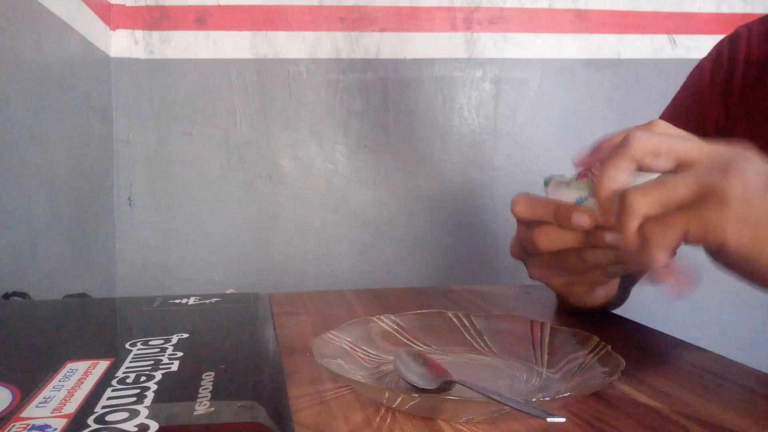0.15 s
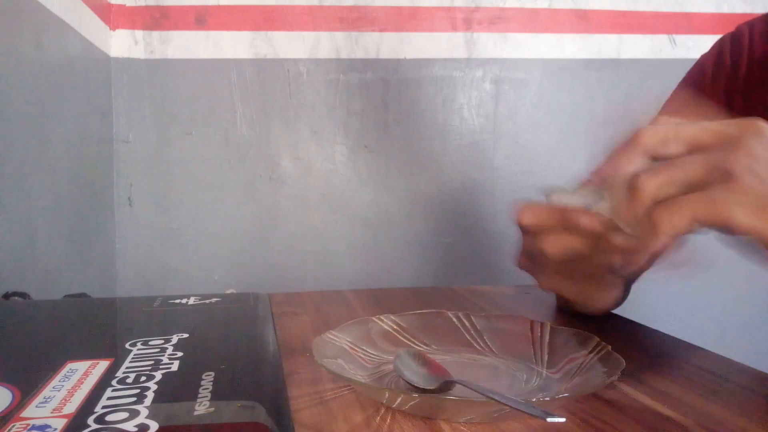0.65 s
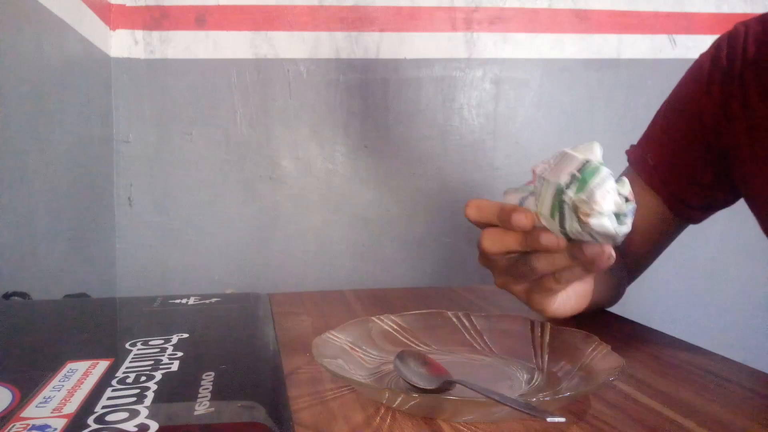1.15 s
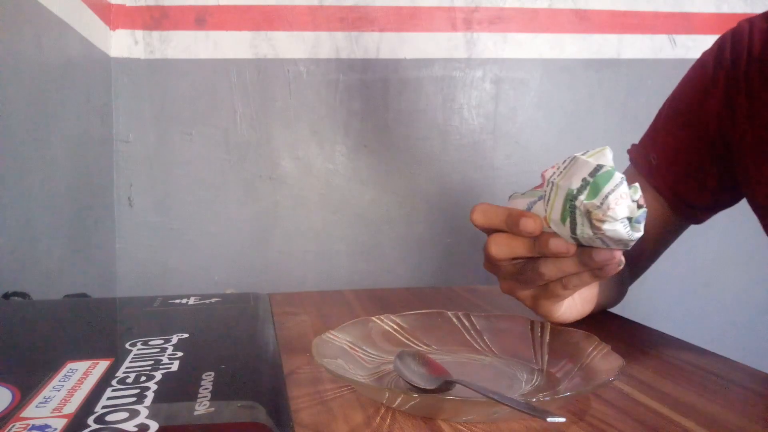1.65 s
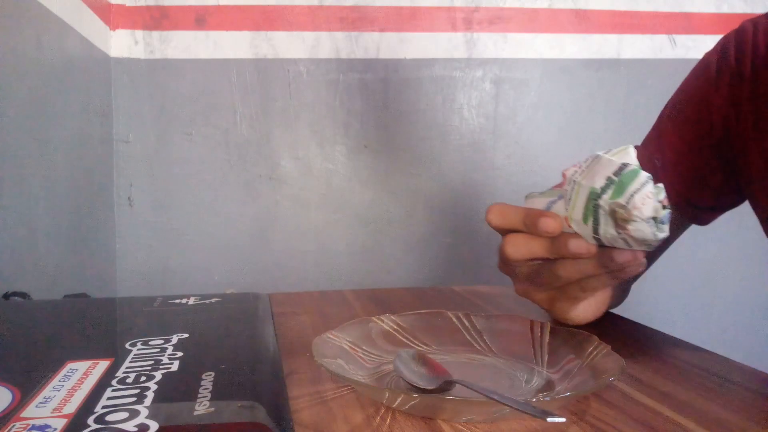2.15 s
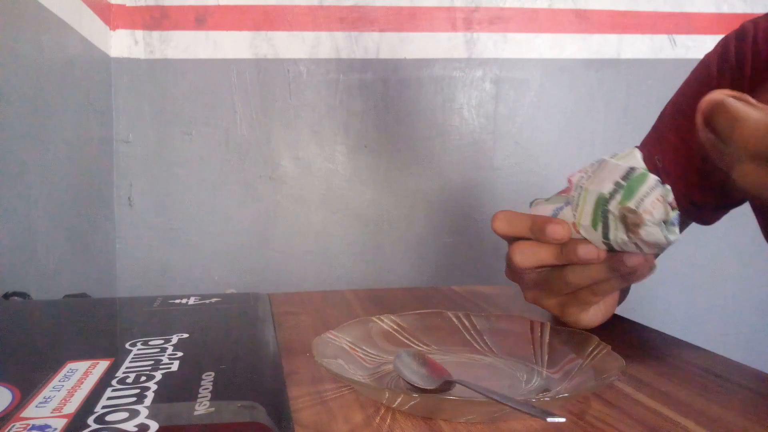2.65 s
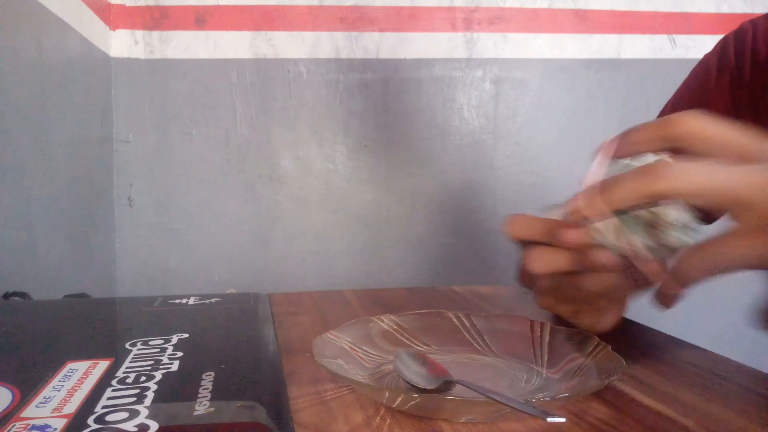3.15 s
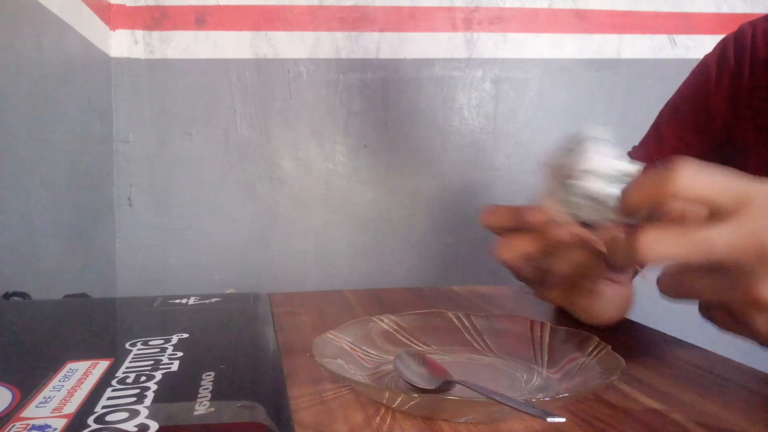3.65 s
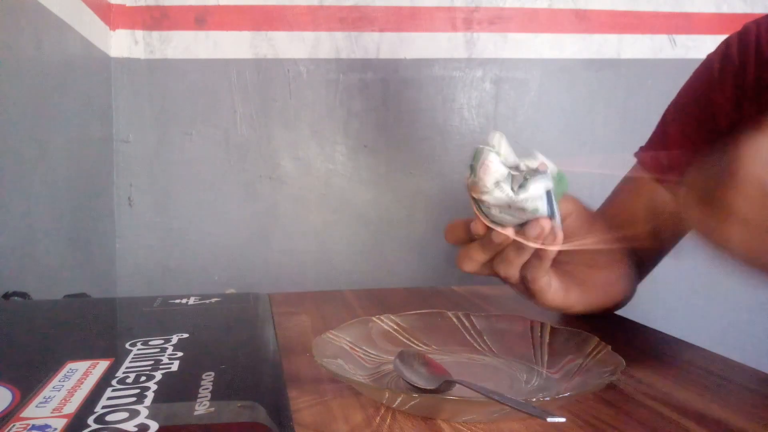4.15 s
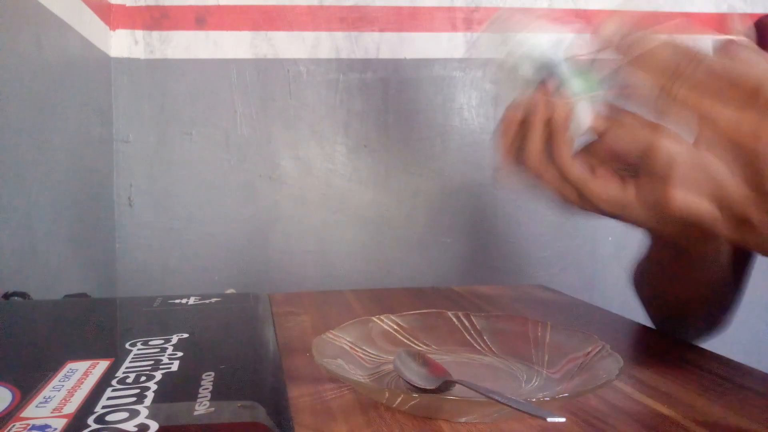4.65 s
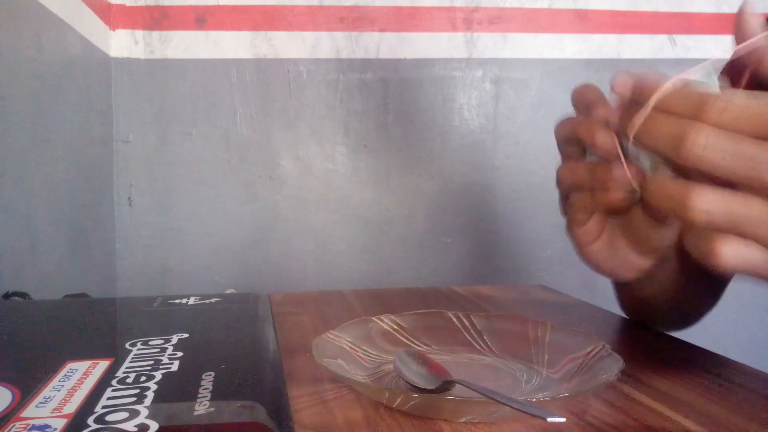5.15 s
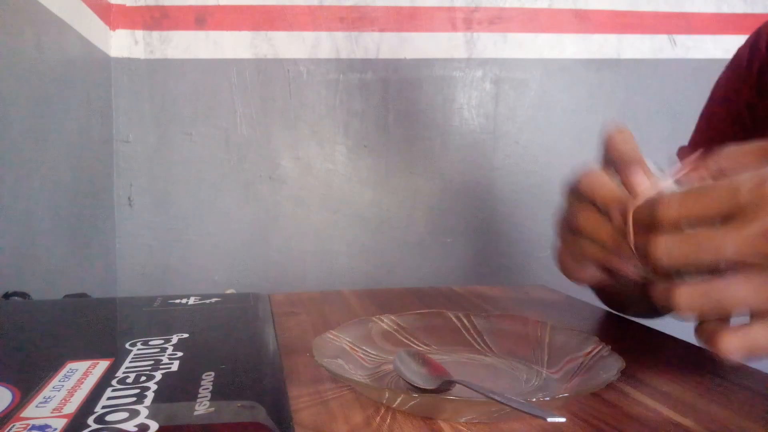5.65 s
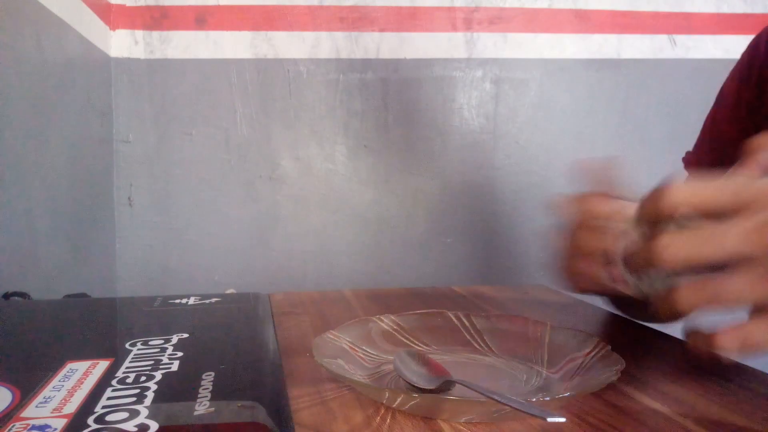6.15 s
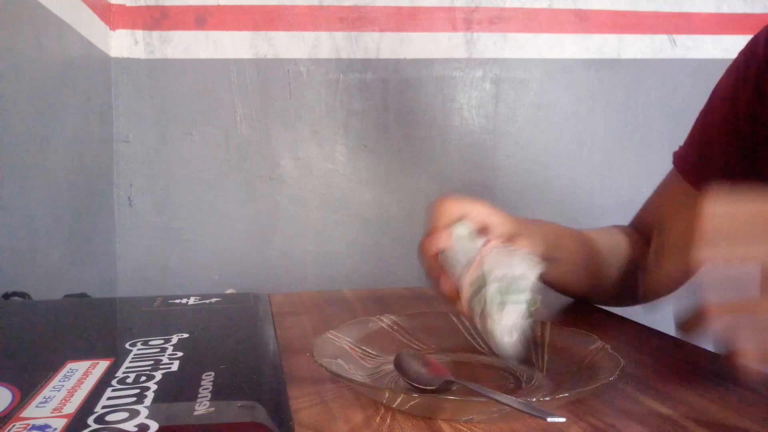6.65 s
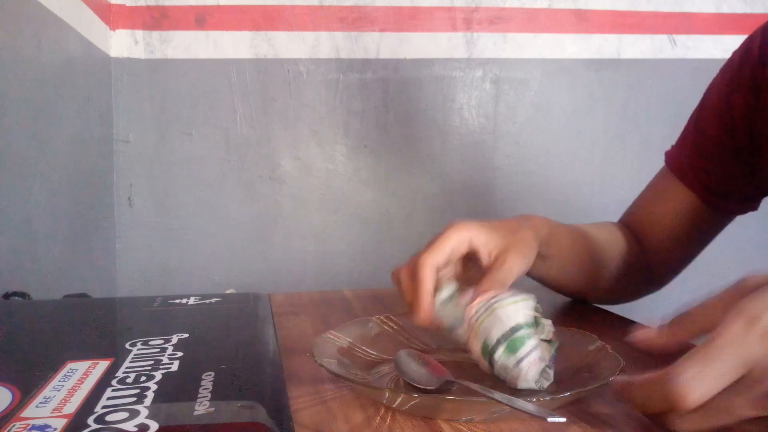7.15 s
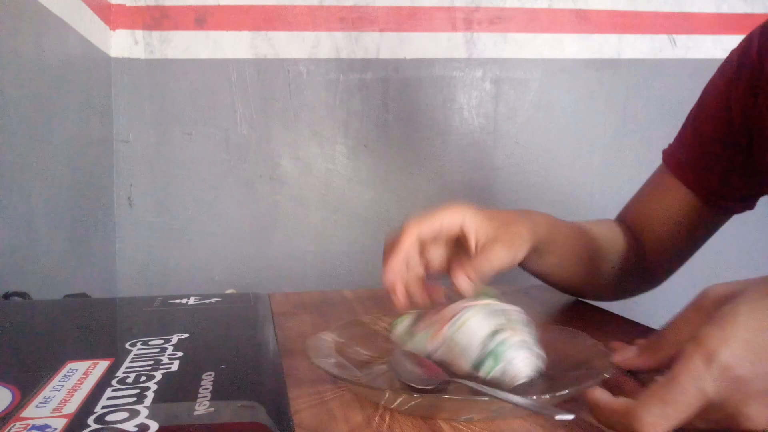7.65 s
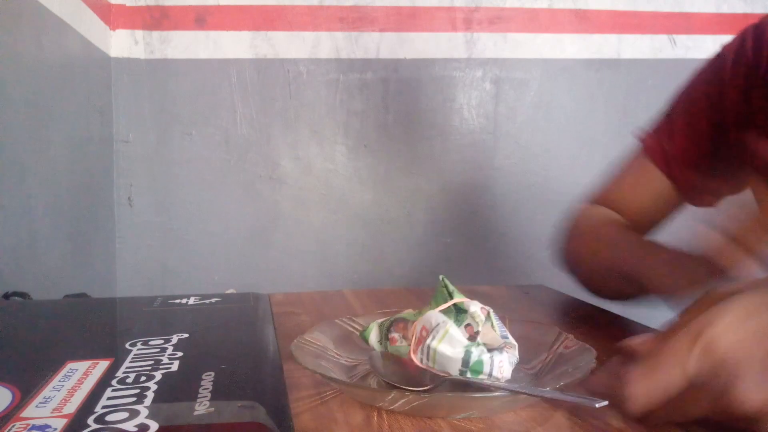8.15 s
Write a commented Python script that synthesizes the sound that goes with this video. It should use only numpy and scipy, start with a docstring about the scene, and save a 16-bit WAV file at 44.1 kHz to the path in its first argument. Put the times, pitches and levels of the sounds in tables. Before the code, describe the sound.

Paper wrapper crackles and creases in close hands, then is set down softly before a glass plate slides on wood and a spoon clinks.

```python
"""Paper parcel on a plate

A paper food wrapper is folded and touches a glass plate; the plate slides on a wooden table, a spoon clinks.
Creases are noise bursts into resonances, rustle is clumped crackle, wood and glass are ringing modes.
Snaps, table and plate excite a small bare room. Behind lie a low rumble that swells at times with the
handling, faint resonances, hiss, a brief far drone of harmonics and a far chirp of gliding partials."""
import sys
import numpy as np
from scipy import signal
from scipy.fft import rfft, irfft
from scipy.io import wavfile

SR = 44100
rng = np.random.default_rng(int(sys.argv[2]) if len(sys.argv) > 2 else 0)


def volts(x):
    """Linear amplitude factor 10**(x/20) for a level x in dB, scalar or array-like."""
    e = np.asarray(x, float) / 20
    return 10 ** e


def master(y):
    """Save y as 16-bit WAV."""
    cut = np.clip(np.atleast_2d(y).T, -1, 1)
    pcm = np.round(cut * 32767)  # scale
    wavfile.write(sys.argv[1], SR, pcm.astype(np.int16))


N = 364707


def rms_one(x):
    """Scale to rms 1."""
    return x / np.sqrt(np.mean(x ** 2) + 1e-20)


def in_time(rows):
    """Table columns as curves, sample by sample."""
    s, *columns = np.transpose(rows)
    return [np.interp(np.arange(N) / SR, s, c) for c in columns]


def during(rows, fade_s):
    """1 while a table lasts, fading to 0 outside."""
    start, end = rows[0][0], rows[-1][0]
    return np.interp(np.arange(N) / SR, [start - fade_s, start, end, end + fade_s], [0, 1, 1, 0])


def band(x, low_hz, high_hz):
    """Band-pass."""
    return signal.sosfilt(signal.butter(2, [low_hz, high_hz], "band", fs=SR, output="sos"), x + 1e-18)


def hump(x, hz, width_hz):
    """Resonance with peak gain 1."""
    r = np.exp(-np.pi * width_hz / SR)
    feedback = [1, -2 * r * np.cos(2 * np.pi * hz / SR), r * r]
    return signal.lfilter([(1 - r * r) / 2, 0, (r * r - 1) / 2], feedback, x)


def ring(clicks, hz, t60_s):
    """Decaying mode: a unit click starts a sine of height 1."""
    r, w = volts(-60 / (t60_s * SR)), 2 * np.pi * hz / SR
    return signal.lfilter([0, np.sin(w)], [1, -2 * r * np.cos(w), r * r], clicks + 1e-18)


def drift(rate_hz):
    """Slow random curve of rms 1: noise through two equal low-pass poles."""
    step = 40   # computed every 40th sample
    r = np.exp(-2 * np.pi * step * rate_hz / SR)
    noise = rng.standard_normal(N // step + 2002)
    slow = signal.lfilter([1], [1, -2 * r, r * r], noise)[2000:]
    return np.interp(np.arange(N) / step, np.arange(len(slow)), rms_one(slow))


def grains(per_s, spread_db):
    """Random clicks of uneven size and sign, rms 1."""
    sizes = volts(spread_db * np.minimum(rng.exponential(1, N), 5)) * rng.choice([-1, 1], N)
    return rms_one(sizes * (rng.random(N) < per_s / SR))


def folds_db(middle_db, edge_db, bright_db):
    """Levels of broad, middle and fine folds: brightness tilts fine against broad."""
    return [edge_db - bright_db / 2, middle_db, edge_db + bright_db / 2]


# room tone spectrum: f/Hz, relative density/dB per Hz
HISS_SPECTRUM = [(18, -42), (30, -4), (64, 0), (161, 4.5), (264, -12.5), (372, -22.5), (581, -8),
                 (1030, -17), (1610, -10), (2870, -19.5), (5990, -12.5), (8200, -36), (10400, -21),
                 (13200, -28.5), (15800, -20.5)]


def hiss():
    """Steady room tone: white noise shaped in the spectrum."""
    level_db = -74.5   # rms within 500-21000 Hz
    hz = np.maximum(np.fft.rfftfreq(N, 1 / SR), 20)
    shape_hz, shape_db = np.transpose(HISS_SPECTRUM)
    shape = volts(np.interp(np.log(hz), np.log(shape_hz), shape_db))
    noise = irfft(rfft(rng.standard_normal(N)) * shape, N)
    return volts(level_db) * noise / np.std(band(noise, 500, 21000))


# low rumble, swelling at times with the handling: t/s, lower pair level/dB, upper pair level/dB
RUMBLE_LEVELS = [(0.0, -66.5, -65.5), (2.14, -73.5, -73), (2.39, -67.5, -74), (2.62, -73, -72),
                 (3.18, -77.5, -72), (3.5, -66.5, -69.5), (3.75, -71, -75), (4.79, -66, -81),
                 (5.37, -67.5, -78.5), (6.13, -76, -69.5), (6.47, -73.5, -79.5), (7.09, -70.5, -77),
                 (7.6, -74.5, -71.5), (7.92, -63, -58), (8.15, -74, -69), (8.27, -77, -75)]
# its resonances: f/Hz, width of first pass/Hz, relative level/dB
RUMBLE_RESONANCES = [(146.5, 27, 0), (201, 49, -3), (295.5, 78, -2), (383, 49, -6.5)]


def rumble():
    """Low noise in two pairs of resonances, each wavering in level."""
    out = 0
    pair_levels = np.repeat(in_time(RUMBLE_LEVELS), 2, axis=0)
    for (hz, width_hz, db), pair_db in zip(RUMBLE_RESONANCES, pair_levels):
        tone = hump(hump(rng.standard_normal(N), hz, width_hz), hz, 2 * width_hz)
        out = out + volts(pair_db + db + 4.04 * drift(3.25)) * rms_one(tone)
    return out


# faint resonances in the room tone: f/Hz, width of each pass/Hz, mean level/dB
MURMUR_RESONANCES = [(554, 170, -91), (797, 80, -89), (1700, 73, -91.5), (4340, 150, -98), (5890, 270, -90)]


def murmur():
    """One noise through narrow resonances, each wandering in level."""
    noise, out = rng.standard_normal(N), 0
    for hz, width_hz, db in MURMUR_RESONANCES:
        tone = hump(hump(noise, hz, width_hz), hz, width_hz)
        out = out + volts(db + 4.3 * drift(1.9)) * rms_one(tone)
    return out


# fingers brushing paper: t of top/s, rise sigma/s, fall sigma/s, middle fold level/dB, brightness/dB
PAPER_RUBS = [(.11, 0.012, 0.07, -67.5, 20), (.763, 0.017, 0.033, -53.5, 5),
              (1.125, 0.043, .032, -73.5, 12), (1.515, 0.013, .027, -67.5, -46),
              (1.61, 0.0028, 0.018, -67.5, 12), (1.70, 0.024, 0.024, -71, 26),
              (3.462, 0.011, 0.085, -59, 8), (3.695, 0.015, .03, -55.5, 15),
              (4.38, 0.016, 0.051, -67.5, 3.5), (4.80, 0.048, 0.049, -69.5, -3),
              (5.05, 0.0037, 0.073, -65.5, 7), (5.32, 0.0076, 0.015, -71, 28),
              (5.375, .0044, 0.084, -61, 3), (5.519, 0.021, 0.036, -59, 5.5), (6.351, 0.1, 0.033, -62, 17),
              (6.615, 0.014, 0.031, -66.5, 7), (6.83, .033, 0.042, -69.5, 12),
              (7.09, 0.032, 0.054, -74.5, 22), (7.55, 0.036, 0.026, -78, 8)]


def rubs():
    """Brush gains of the three fold sizes: each swells and dies as a lopsided bell."""
    edge_db = -1.5   # broad and fine folds against middle
    t, swell = np.arange(0, N / SR, .001), 0
    for s, rise_s, fall_s, db, bright_db in PAPER_RUBS:
        shape = np.exp(-.5 * ((t - s) / np.where(t < s, rise_s, fall_s)) ** 2)
        gains = volts(np.array(folds_db(db, db + edge_db, bright_db)))
        swell = swell + gains[:, None] * shape
    return [np.interp(np.arange(N) / SR, t, row) for row in swell]


# broad, middle, fine folds: low f/Hz, high f/Hz
FOLD_BANDS = [(450, 1600), (1600, 6500), (6500, 15800)]
# paper rustle; from 7.88 s the scrape of the sliding plate:
# t/s, middle fold level/dB, brightness (fine over broad)/dB
RUSTLE_LEVELS = [(0, -73.5, -13), (.378, -56.5, 18), (.558, -63, -9), (.9, -74, 6), (1.3, -82, 3),
                 (1.7, -70, 8), (1.95, -79.5, -2.5), (3.12, -84, -4), (3.4, -68.5, 8), (3.58, -60.5, -9),
                 (3.97, -70.5, 4), (4.65, -73.5, -1), (4.72, -80, -11), (5.32, -66.5, 16), (5.7, -70.5, 8),
                 (5.97, -56.5, -3), (6.15, -65, -5), (6.34, -64, -13), (6.45, -79, 10), (6.88, -83, -11),
                 (7.02, -76, 13), (7.5, -93, 1), (7.88, -71.5, -17), (7.94, -54, -9), (8.11, -66, -19),
                 (8.27, -80, 2)]


def rustle():
    """Dense crackle in clumps through fold resonances whose levels wander, so the colour does too."""
    even_db, edge_follow = -81, 0.56   # folds level here; broad and fine follow this share of the rise
    out, clumps = 0, drift(42)
    level_db, bright_db = in_time(RUSTLE_LEVELS)
    edge_db = even_db + edge_follow * (level_db - even_db)
    sliding_db = folds_db(level_db, edge_db, bright_db)
    for (low, high), db, swell in zip(FOLD_BANDS, sliding_db, rubs()):
        crackle = grains(3100, spread_db=2.5) + 1.7 * rng.standard_normal(N)
        folds = 0
        for hz in np.geomspace(1.124 * low, high / 1.134, 6):
            folds = folds + volts(3.5 * drift(4)) * hump(crackle, hz, .16 * hz) / np.sqrt(hz)
        out = out + rms_one(band(folds, low, high)) * (volts(db) + swell) * volts(1.38 * clumps)
    return out


def random_snaps():
    """Small creases at random, denser and louder with the rustle; rows as SET_SNAPS."""
    count, put_down_s = 60, 7.3   # none once the parcel lies still
    density = 1.1   # exponent on rustle amplitude
    level_db = in_time(RUSTLE_LEVELS)[0]
    share = np.cumsum(volts(density * level_db[:round(put_down_s * SR)]))
    when, loudness, pitch, brightness = rng.random((count, 4)).T
    at = np.searchsorted(share, when * share[-1]).clip(0, N - 1)
    flap_db = level_db[at] + 11.5 + 12.8 * loudness
    flap_hz = 650 * 6.4 ** pitch
    return np.column_stack([at / SR, flap_db, flap_hz, flap_db - 17, 30 * (brightness - .4)])


# creases at set times, loud and faint:
# t/s, flap peak/dB, flap f/Hz, sheet shake level/dB, brightness (fine over broad)/dB
SET_SNAPS = [(.024, -42, 790, -58.5, -17), (.064, -42.5, 760, -66, 2), (.141, -51, 760, -48, 20),
             (.169, -30.5, 7000, -38, 25), (.254, -34, 1800, -49, -6), (.261, -30, 4260, -54.5, -17),
             (.266, -32, 810, -54, -2), (.299, -38, 2040, -55, 13), (.328, -48, 1720, -55, 21),
             (.367, -26, 5670, -49.5, 14), (.383, -18.5, 7150, -41.5, 13.5), (.442, -37, 2260, -67, -10),
             (.462, -45, 790, -47, -6), (.478, -37, 3670, -42, -3.5), (.507, -41, 800, -46.5, 1),
             (.602, -30.5, 3930, -52.5, 32), (.632, -29, 4960, -49, 29.5), (.67, -34, 6500, -50, 22),
             (.674, -34.5, 6330, -49, 2), (.688, -49, 2350, -48, 10), (.728, -37.5, 4900, -57, -6),
             (.968, -36.5, 4000, -50, 3.5), (1.02, -40, 2240, -64, -16), (1.131, -53.5, 5600, -54, 13),
             (1.491, -36, 840, -43.5, 8), (1.53, -38, 804, -53, 20), (1.653, -39, 2200, -54, 21),
             (3.197, -57, 6050, -72, 26), (3.271, -57, 1540, -66, 20), (3.325, -49, 5530, -72, 33),
             (3.508, -32, 6500, -61, 30), (3.516, -37, 426, -31.5, -2), (3.566, -29.5, 1280, -41, 3),
             (3.607, -27, 1820, -41, -4), (3.661, -42, 1740, -50.5, -8), (3.709, -43, 6320, -52, 20),
             (3.801, -61, 681, -76, -7), (3.852, -57, 2400, -69, -24), (4.051, -42.5, 800, -64, 4),
             (4.096, -39.5, 641, -42, 0), (4.119, -41, 1650, -50.5, 6), (4.315, -47, 708, -65, 7),
             (4.731, -38.5, 3670, -47, 7.5), (4.774, -32.5, 4240, -52.5, 8), (4.85, -52, 540, -46, -14),
             (5.002, -54.5, 2150, -68, 3), (5.072, -51, 643, -59, 2), (5.162, -22, 2330, -31.5, 17.5),
             (5.233, -35.5, 2030, -47.5, -9), (5.245, -43, 7000, -56, 27), (5.289, -39, 810, -46, -9),
             (5.359, -15.5, 2700, -38.5, 12), (5.397, -24, 1506, -34.5, 8), (5.611, -37, 2050, -53.5, -6),
             (5.658, -49, 2250, -58, 32), (5.751, -26.5, 1303, -33.5, -4), (5.813, -33, 1860, -49, -4),
             (5.853, -23.5, 1820, -41, -4.5), (5.917, -36, 810, -55, 0), (5.931, -53, 830, -47, 15),
             (5.95, -26, 3490, -30.5, 8.5), (5.972, -43, 896, -52, 0), (5.997, -46, 3000, -53, 9),
             (6.018, -31, 1180, -41.5, 13), (6.036, -32, 1390, -41, -11), (6.117, -46, 2610, -54.5, 4),
             (6.142, -38, 1150, -56, -9), (6.155, -43, 800, -51, 12.5), (6.167, -19, 4520, -33.5, 1),
             (6.17, -15, 1740, -24, 8), (6.243, -39.5, 870, -64, 15), (6.274, -38.5, 1150, -55, 27),
             (6.603, -34.5, 7000, -58.5, 33), (6.617, -41, 5000, -62, 33), (6.852, -53.5, 3720, -51.5, -2),
             (7.276, -51, 650, -65, 7), (7.592, -51.5, 2300, -65, -9)]


def snaps():
    """A crease buckles in a burst of a few ms; the whole sheet shakes and one flap rings out."""
    buckle_s_at_1k, buckle_slope, buckle_spread = 3.1e-3, .22, .15   # smaller flaps buckle faster
    crack, fold_ring, jolt_share = .32, 1.8, .15
    edge_db, shake_s = -3, .0023   # broad and fine against middle; span that the shake level refers to
    out, t = np.zeros((4, N + 2600)), np.arange(2600) / SR
    rows = np.vstack([SET_SNAPS, random_snaps()])
    shaking, chance = rng.standard_normal((len(rows), 4, len(t))), rng.standard_normal(len(rows))
    jolts = rng.random((len(rows), 1, len(t) // 20)) < jolt_share
    shaking *= 0.65 + 1.4 * np.repeat(jolts, 20, axis=2)
    pitches = rng.random((len(rows), 3))
    for row, noise, luck, pitch in zip(rows, shaking, chance, pitches):
        s, flap_db, flap_hz, sheet_db, bright_db = row
        tau_s = buckle_s_at_1k * (1000 / flap_hz) ** buckle_slope * np.exp(buckle_spread * luck)
        attack = np.minimum(t / (0.6 * tau_s), 1)
        burst = noise * (np.exp(-t / tau_s) + 0.049 * np.exp(-t / 0.01)) * attack
        burst[:, round(.4 * tau_s * SR)] += crack * np.sqrt(tau_s * SR)   # the crease flips
        now = slice(round(s * SR), round(s * SR) + len(t))
        flap = hump(burst[3], flap_hz, .34 * flap_hz)
        out[3, now] += volts(flap_db) * flap / np.abs(flap).max()
        for k, db in enumerate(folds_db(sheet_db, sheet_db + edge_db, bright_db)):
            low, high = FOLD_BANDS[k]
            sheet = band(burst[k], low, high)
            hz = low * (high / low) ** pitch[k]   # each fold size rings at a pitch of its own
            sheet = sheet + fold_ring * hump(sheet, hz, 0.14 * hz)
            out[k, now] += volts(db) * sheet * np.sqrt(shake_s * SR) / np.linalg.norm(sheet)
    sheets = sum(band(out[k, :N], .75 * low, 1.1 * high) for k, (low, high) in enumerate(FOLD_BANDS))
    return out[3, :N] + sheets


# table knocks: t/s, drive level/dB, contact time scale/ms
TABLE_KNOCKS = [(.549, -61, 1.3), (.768, -49, 0.25), (1.489, -42.5, 0.57), (1.514, -32.5, 0.13),
                (1.527, -60, 0.19), (3.513, -53, 0.24), (3.562, -36, 0.16), (4.433, -46, 0.5),
                (6.392, -52, 0.32), (6.854, -33.5, 2.95), (7.015, -48, 0.97), (7.061, -61, .65),
                (7.274, -46.5, 1.2), (7.298, -51.5, 0.78), (7.594, -50, 1), (7.908, -36.5, 0.56),
                (7.967, -37, 0.46)]
# table top modes: f/Hz, relative level/dB, t60 when knocked/s
TABLE_MODES = [(69, -24, 0.26), (124, 2, 0.048), (141, -7, 0.12), (179.5, -1.5, 0.13), (248.5, -8, 0.2),
               (306, 0, 0.08), (379, -3.5, 0.16), (487, -2, 0.077), (538, -2, 0.026), (810, 5, 0.019),
               (920, -6.5, 0.048), (1150, -6, 0.07)]


def table(rubbing):
    """Knocks and the dragged plate ring the modes of the table top."""
    knocks, t = np.zeros(N + 900), np.arange(900) / SR
    for s, db, contact_ms in TABLE_KNOCKS:
        # press and spring back: long contact is deep
        push = np.gradient(t ** 2 * np.exp(-1500 * t / max(contact_ms, .05)))
        at = round(s * SR)
        knocks[at:at + 900] += volts(db) * push / np.abs(push).sum()
    knocked, rubbed = 0, 0
    for k, (hz, db, t60_s) in enumerate(TABLE_MODES):
        knocked = knocked + (-1) ** k * volts(db) * ring(knocks[:N], hz, t60_s)
        rubbed = rubbed + volts(db) * ring(rng.standard_normal(N), hz, .5 * t60_s)
    return knocked + rubbing * rms_one(band(rubbed, 130, 1100))


# single folds scuffing: t/s, sigma/s, f/Hz, peak level/dB
FOLD_SCUFFS = [(1.147, 0.027, 1950, -64), (2.103, .034, 1700, -77), (2.755, 0.021, 2310, -70),
               (4.81, 0.023, 4560, -64), (5.01, 0.0068, 2110, -60), (5.413, 0.029, 2480, -46.5),
               (5.62, .031, 2270, -66), (6.615, .016, 1450, -67), (7.223, .0078, 1580, -67.5),
               (7.29, 0.037, 1900, -75)]


def scuffs():
    """A single fold scuffs at its own pitch: a swell of noise twice through one resonance."""
    t, out = np.arange(N) / SR, 0
    noise = rng.standard_normal(N)
    for s, sigma_s, hz, db in FOLD_SCUFFS:
        tone = rms_one(hump(hump(noise, hz, 0.32 * hz), hz, 0.32 * hz))
        out = out + volts(db) * np.exp(-.5 * ((t - s) / sigma_s) ** 2) * tone
    return out


# far chirp, one table a partial: t/s, f/Hz, relative level/dB
CHIRP_PARTIALS = [(2.34, 8100, -90), (2.41, 7780, -67), (2.47, 7800, -89)], [(2.34, 10600, -76),
                  (2.378, 10350, -73), (2.44, 11100, -76)], [(2.36, 11619, -91), (2.376, 11767, -79),
                  (2.45, 10951, -80)]


def chirp():
    """Three thin gliding sines, fluttering in level."""
    out = 0
    for rows in CHIRP_PARTIALS:
        hz, db = in_time(rows)
        level = np.sqrt(2) * volts(db) * during(rows, 0.0079) * 0.77 * drift(90)
        out = out + level * np.sin(2 * np.pi * np.cumsum(hz) / SR)
    return out


# drone harmonics: multiple of the fundamental, level/dB
DRONE_HARMONICS = [(5, -65), (6, -70), (7, -78)]


def drone():
    """Harmonics of a far, slightly wavering low note that swells once."""
    middle_s, spread_s, fundamental_hz = 2.56, 0.14, 56
    t = np.arange(N) / SR
    phase = 2 * np.pi * np.cumsum(fundamental_hz * (1 + .004 * drift(4.1))) / SR
    swell = np.exp(-.5 * ((t - middle_s) / spread_s) ** 4)
    tones = sum(volts(db) * np.sin(round(k) * phase) for k, db in DRONE_HARMONICS)
    return np.sqrt(2) * swell * tones


# light touches and taps on the plate: the parcel at 6.853, 7.012, 7.278 s, then the spoon:
# t/s, relative level/dB, damping of the low modes (-1..1)
PLATE_TAPS = [(6.853, -73, 0.0065), (7.012, -72, 0.5), (7.278, -70, .1), (7.906, -45, 0.0026),
              (7.909, -42, 0.16), (7.913, -42.5, 0.033), (7.927, -44, 0.84), (7.966, -43.5, .1),
              (7.975, -45, .16), (7.982, -64.5, -.18), (8.0, -66, -0.26), (8.03, -63, -0.14),
              (8.06, -69, -0.062), (8.075, -73, -0.26), (8.09, -70, -0.34), (8.105, -69.5, -0.18),
              (8.205, -60.5, .6), (8.248, -69, .9)]
# glass modes: nominal f/Hz, relative level/dB, undamped t60/s
PLATE_MODES = [(824, -18, 0.16), (1420, -32, 0.067), (1900, -11, 0.17), (2177, -1.5, 0.069),
               (2637, 2.5, 0.054), (2850, -7, 0.025), (3360, 1.5, 0.077), (4150, -17, 0.38),
               (4580, -3, 0.038), (5280, -9, .08), (5570, -3, 0.033), (6050, -17, 0.15), (6870, -13.5, .14),
               (8300, -11, 0.078), (9440, -11.5, 0.051), (10000, -29, .08), (10300, -13, 0.061),
               (10000, -24, 0.052), (11100, -18, .12), (11500, -15, .12), (12500, -16, 0.054),
               (13400, -11, .07)]


def plate(rubbing):
    """Touches and taps rattle the glass and strike every mode anew; dragging keeps the modes murmuring."""
    hz, level_db, t60_s = np.transpose(PLATE_MODES)[:, :, None]
    out, t = np.zeros(N + 9000), np.arange(9000) / SR
    chance = rng.standard_normal((len(PLATE_TAPS), 2, len(PLATE_MODES), 1))
    rattle = rng.standard_normal((len(PLATE_TAPS), len(t)))
    for (s, db, damping), (strength, detune), noise in zip(PLATE_TAPS, chance, rattle):
        # positive damping mutes the low modes, negative favours them
        muted_db = damping * 40 * np.log2(6100 / hz).clip(-.1, 1.6)
        gain = volts(level_db - muted_db + 2.5 * strength)
        tap_hz = hz * (1 + .008 * detune)
        decay = volts(-60 * t / (t60_s * (1 - 0.77 * abs(damping))))
        modes = np.sum(gain * decay * np.sin(2 * np.pi * tap_hz * t), axis=0)
        chatter = noise * np.exp(-t / 0.0065)   # contact chatter blurs the modes
        blurred = 0
        for f, g in zip(hz[:, 0], gain[:, 0]):
            blurred = blurred + g * hump(chatter, f, 0.04 * f) * np.sqrt(SR / f)
        at = round(s * SR)
        out[at:at + len(t)] += volts(db) * (1.5 * modes + 3.5 * blurred)
    grit = grains(1500, spread_db=-1.5)
    rubbed = sum(volts(db) * ring(grit, f, 0.036 * t60) for f, db, t60 in PLATE_MODES)
    return band(out[:N], 300, 14000) + rubbing * rms_one(rubbed)


def room(x):
    """Dense reflections of a small bare room: six noise tails take turns every 2000 samples."""
    t60_s, treble_t60_s = 0.2, 0.22
    t, out = np.arange(SR // 2) / SR, 0
    place = (np.arange(N) // 2000) % 6
    for k in range(6):
        noise = rng.standard_normal(len(t)) * np.clip(t / .004 - .5, 0, 1)   # silent for 2 ms, full at 6 ms
        treble = band(noise, 4000, 18000)
        tail = (noise - treble) * volts(-60 * t / t60_s) + treble * volts(-60 * t / treble_t60_s)
        out = out + signal.fftconvolve(x * (place == k), tail / np.linalg.norm(tail))[:N]
    return out


# microphone port peaks and dips: f/Hz, width/Hz, gain/dB
MICROPHONE_PEAKS = [(6200, 830, 2.5), (8010, 1250, -7), (10350, 1270, 6.5), (13240, 1280, -11.5),
                    (14970, 1300, 8.5)]


def microphone(x):
    """Peaks and dips of the small microphone port, and its bass cut."""
    for hz, width_hz, db in MICROPHONE_PEAKS:
        g, w = volts(db / 2), 2 * np.pi * hz / SR
        a = np.tan(np.pi * width_hz / SR)
        middle = -2 * np.cos(w)
        x = signal.lfilter([1 + a * g, middle, 1 - a * g], [1 + a / g, middle, 1 - a / g], x)
    return signal.sosfilt(signal.butter(2, 70, "high", fs=SR, output="sos"), x)


# plate dragged over wood: t/s, table level/dB, glass level/dB
PLATE_SLIDE = [(7.55, -86, -95), (7.642, -60.5, -66.5), (7.848, -51.5, -60), (7.946, -52.5, -60.5),
               (8.06, -54.5, -61), (8.12, -62.5, -73), (8.2, -78, -100)]


def scene():
    """Near sounds through the microphone, struck ones with their room, over the background."""
    room_db = -4
    wood_db, glass_db = in_time(PLATE_SLIDE)
    sliding = during(PLATE_SLIDE, 0.032)
    struck = snaps() + table(sliding * volts(wood_db)) + plate(sliding * volts(glass_db))
    near = struck + volts(room_db) * room(struck) + rustle() + scuffs()
    background = hiss() + rumble() + murmur() + chirp() + drone()
    return (microphone(near) + background)[None]


def roll_off(x):
    """The treble ends steeply here."""
    return signal.sosfilt(signal.butter(12, 16820, fs=SR, output="sos"), x)


def record(dry):
    """Cuts the lowest bass and the top."""
    cut = signal.sosfilt(signal.butter(1, 40, "high", fs=SR, output="sos"), dry)
    cut = signal.sosfilt(signal.ellip(8, .5, 22, 15700, fs=SR, output="sos"), cut)
    return roll_off(cut)


dry = scene()
out = record(dry)
master(out)
```